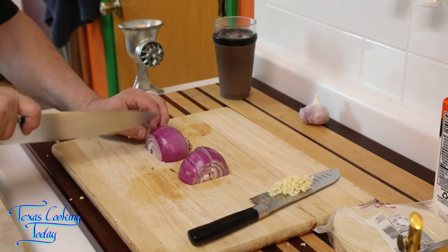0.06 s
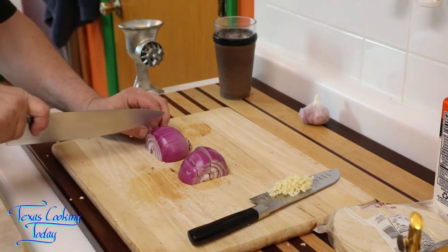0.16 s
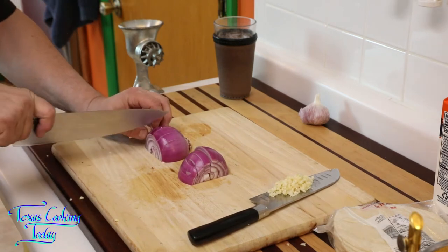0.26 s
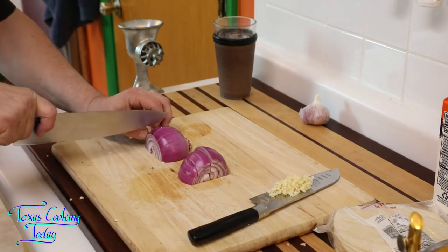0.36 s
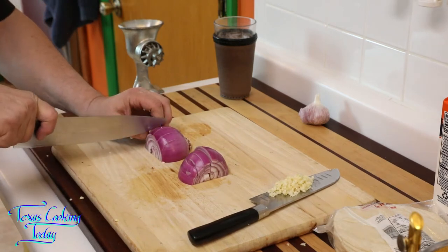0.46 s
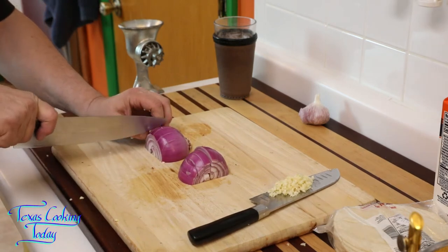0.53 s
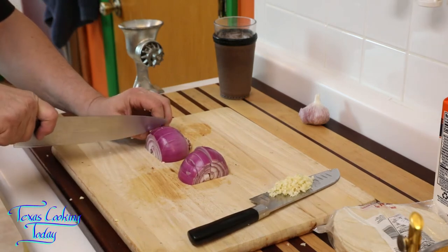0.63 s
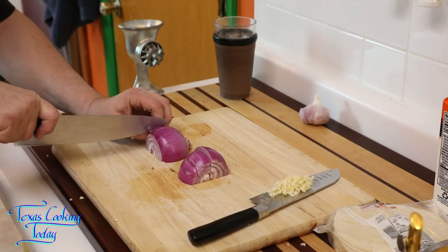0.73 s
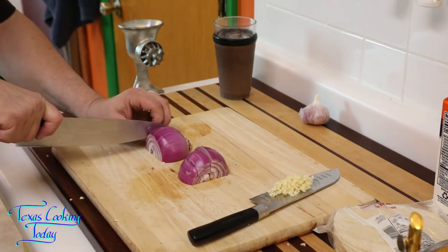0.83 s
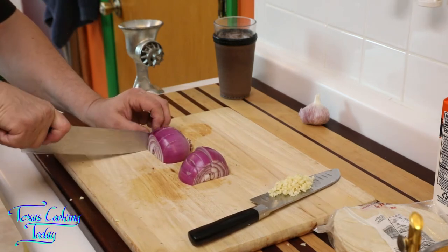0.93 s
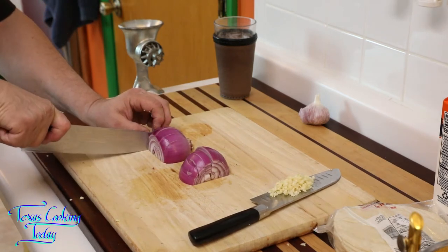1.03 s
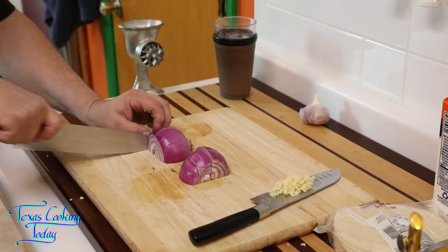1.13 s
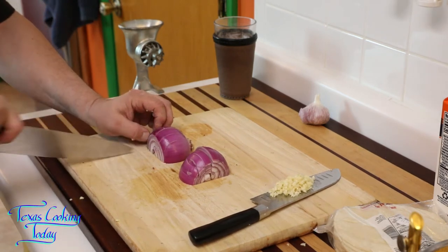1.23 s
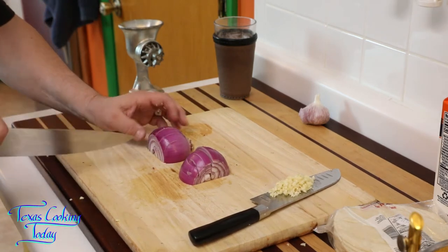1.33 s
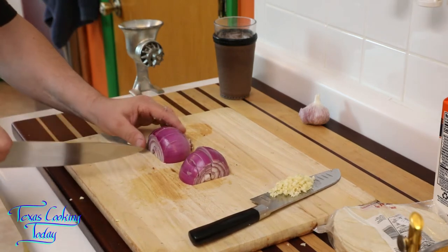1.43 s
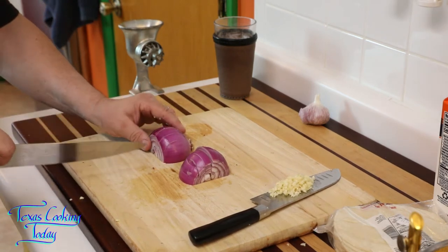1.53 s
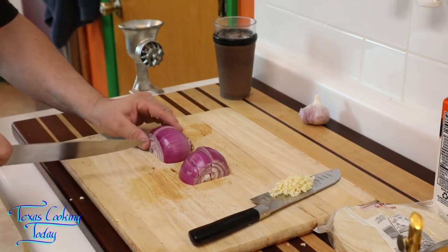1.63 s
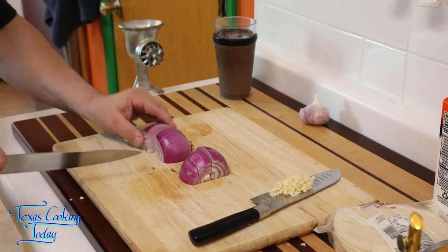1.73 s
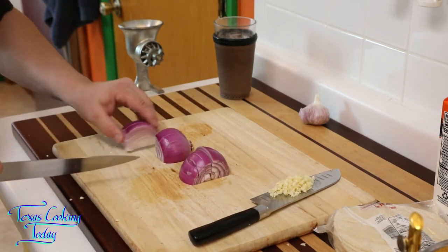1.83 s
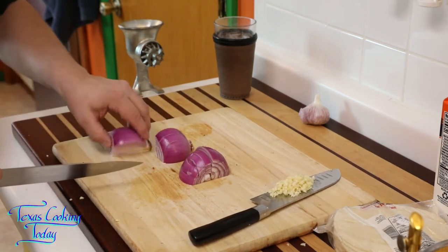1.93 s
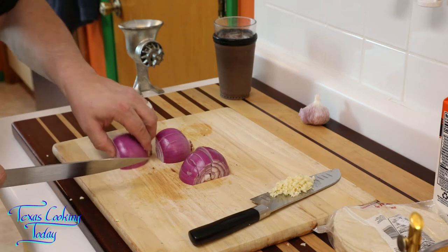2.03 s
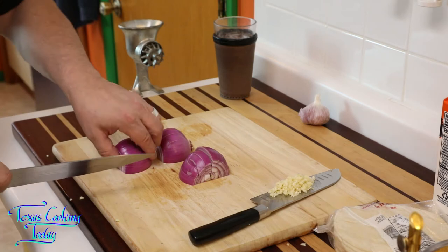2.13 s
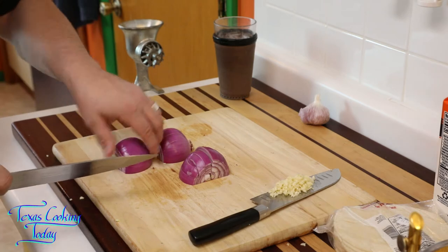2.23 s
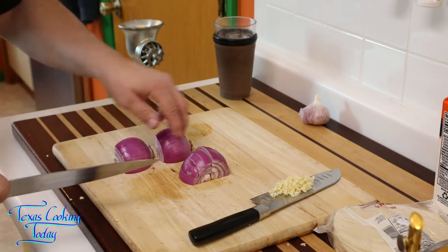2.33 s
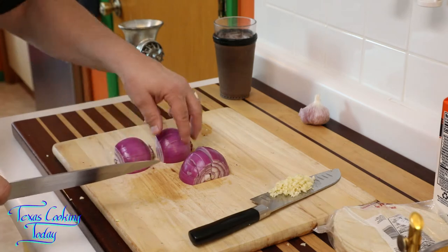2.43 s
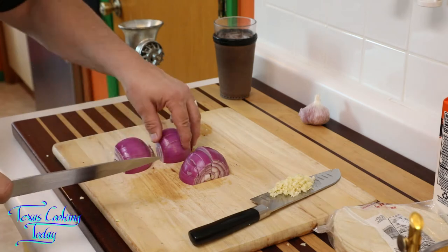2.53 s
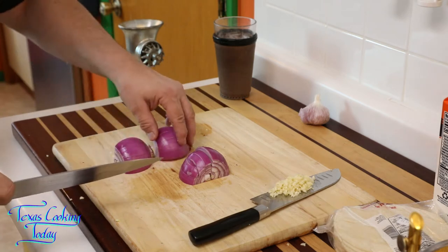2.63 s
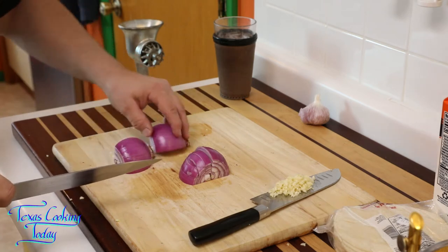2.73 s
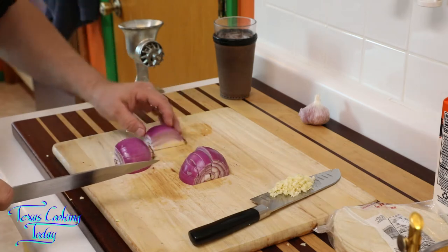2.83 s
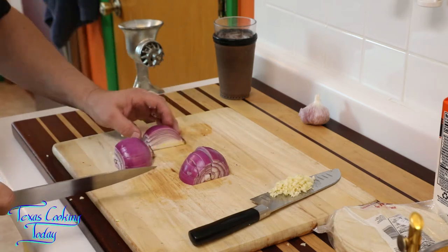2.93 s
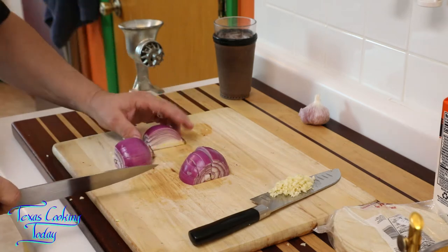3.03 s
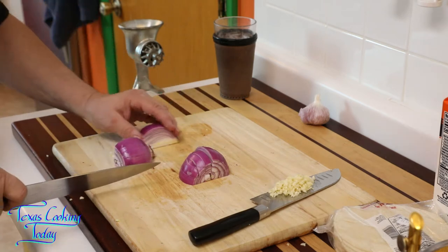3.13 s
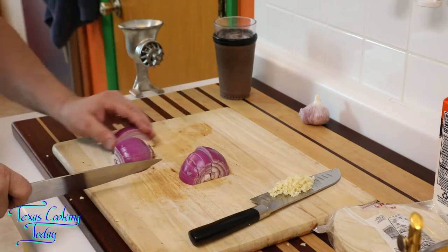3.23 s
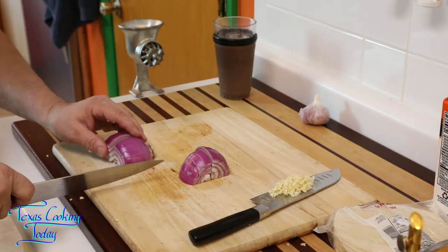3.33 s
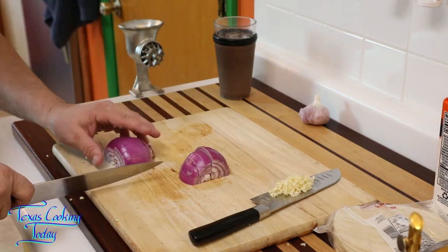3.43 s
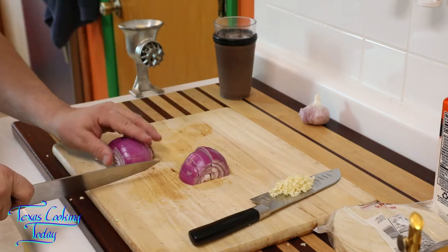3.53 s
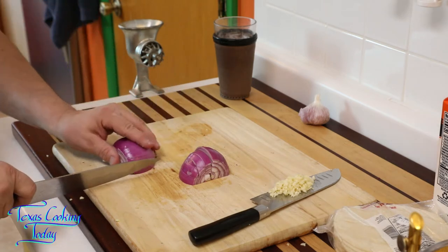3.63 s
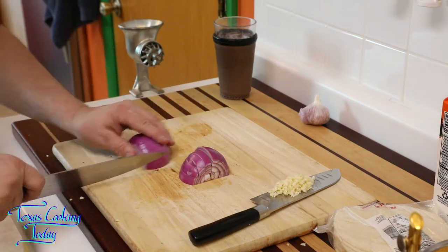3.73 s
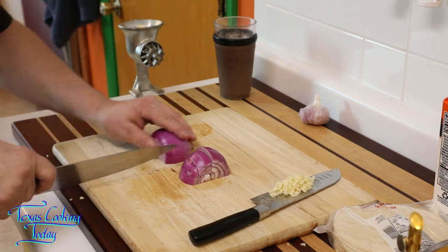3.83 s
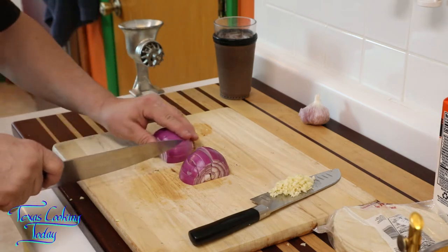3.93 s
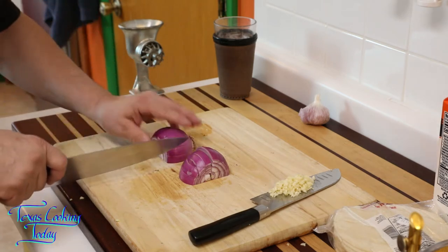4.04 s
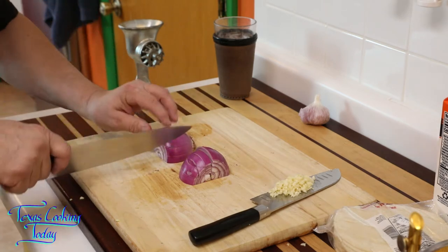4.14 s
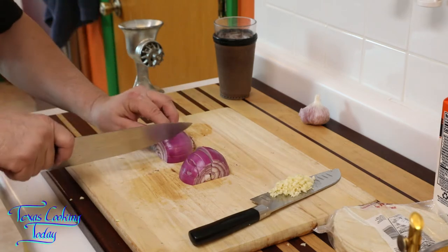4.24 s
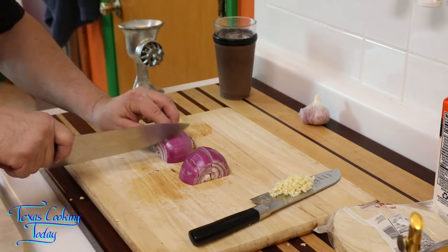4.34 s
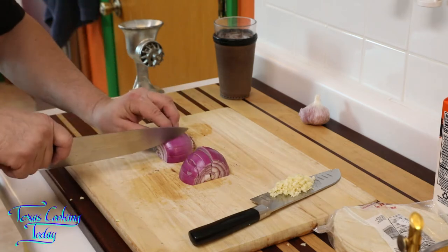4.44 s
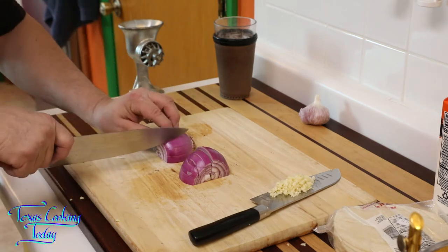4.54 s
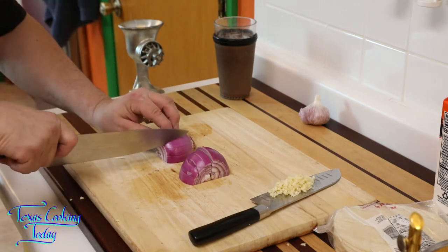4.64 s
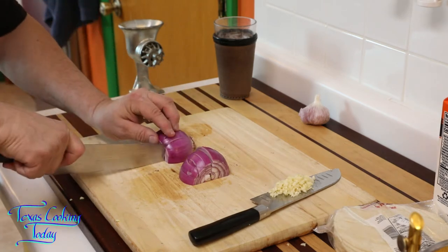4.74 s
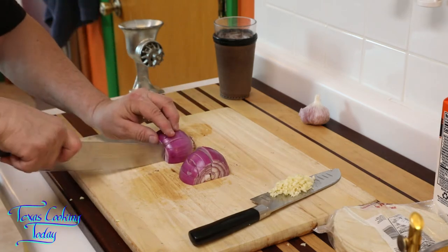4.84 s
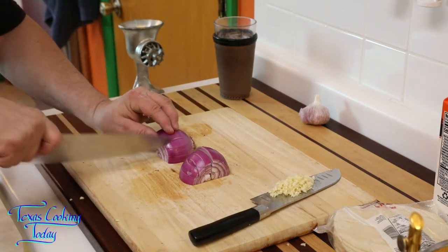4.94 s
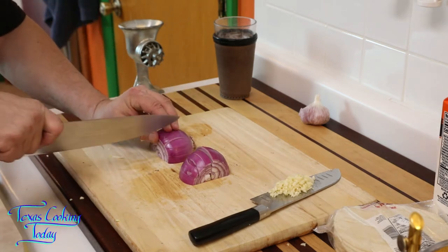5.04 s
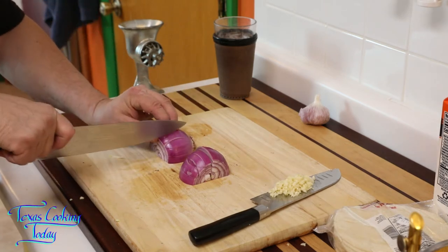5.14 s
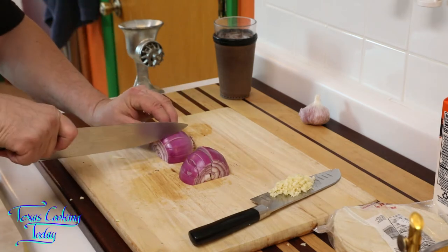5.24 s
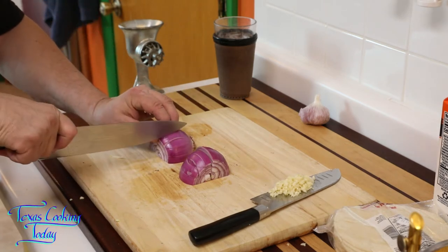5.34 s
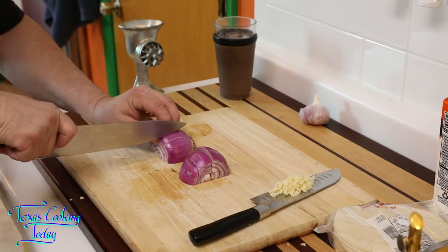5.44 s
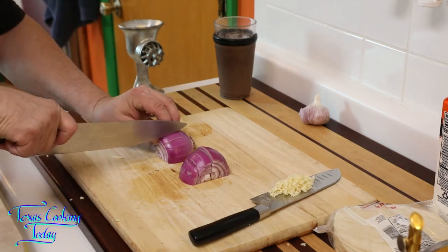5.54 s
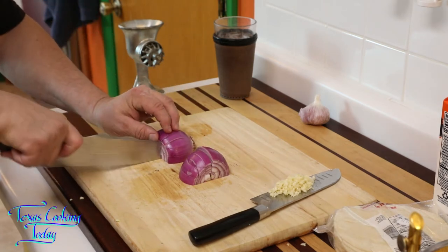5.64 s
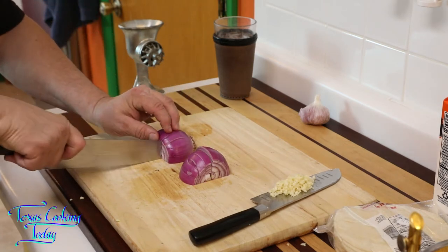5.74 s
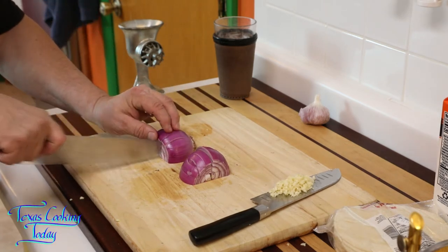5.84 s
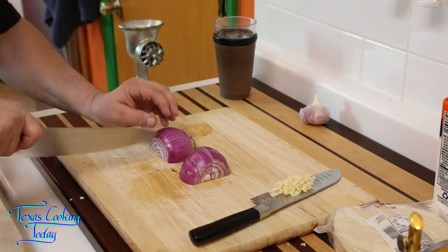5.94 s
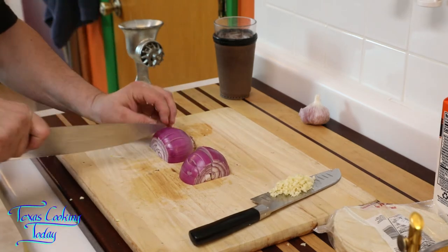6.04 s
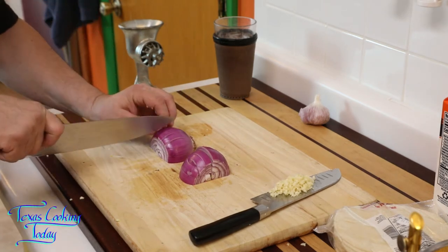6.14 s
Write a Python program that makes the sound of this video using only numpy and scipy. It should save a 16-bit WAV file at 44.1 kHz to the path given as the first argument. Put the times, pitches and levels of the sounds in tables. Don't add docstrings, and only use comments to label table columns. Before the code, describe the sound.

A heavy knife crunches through crisp onion and bangs hard on a wooden board three times, with light taps and slides between, in an echoing tiled kitchen.

```python
import sys
import numpy as np
from scipy import signal
from scipy.fft import rfft, irfft
from scipy.io import wavfile
from scipy.ndimage import uniform_filter1d

SR = 44100
rng = np.random.default_rng(int(sys.argv[2]) if len(sys.argv) > 2 else 0)


def linear_from_db(decibels):
    return 10 ** (np.asarray(decibels, float) / 20)


def master_out(mix):
    frames = np.transpose(np.atleast_2d(mix))
    ceiling = np.clip(frames, -1, 1)
    pcm = np.round(ceiling * 32767).astype(np.int16)
    wavfile.write(sys.argv[1], SR, pcm)


N = 272317
T = np.arange(SR // 2) / SR

# (frequency [Hz], level [dB per Hz])
HUM_SPECTRUM = [(12, -30), (20, 9.5), (222, -1.5), (285, -11.5), (434, -15.5), (678, -17), (780, -16),
                (1030, -14), (1120, -16.5), (2530, -20.5), (2750, -28), (3160, -20.5), (16000, -48)]
# (time [s], effort [dB])
HAND_EFFORT = [(0, 8.5), (.55, -6.5), (.8, -8), (1.3, 10.5), (1.501, 5), (2.151, 2.5), (2.45, -3.5),
               (2.899, 2), (3.3, 0.5), (3.7, 4.5), (4.3, -0.5), (4.649, 0), (5.2, 3), (5.6, 1.5), (6.17, 0)]
# (frequency [Hz], level [dB per Hz])
RUSTLE_SPECTRUM = [(60, -32.5), (150, 6), (350, 6), (700, -3.5), (1500, -13.0), (4000, -45.0)]
# (start [s], length [s], level [dB])
SLIDES = [
    (1.66, 0.22, -66),
    (2.13, .05, -69.5),
    (2.69, .08, -68),
    (3.13, 0.14, -72.5),
    (3.76, 0.14, -52.5),
    (4.07, 0.052, -67.5),
    (5.31, 0.025, -85),
]
# (frequency [Hz], level [dB per Hz])
RUB_SPECTRUM = [(410, -19.5), (700, 5.5), (847, -10), (920, 8), (1020, -12.5), (1210, -3), (1810, -4.5),
                (1990, -4.5), (2620, 0), (2990, -3.5), (3480, -8), (4170, -20), (5220, -11), (12000, -37),
                (15600, -72), (22000, -120)]
# (time [s], peak [dB], hollow body [dB], length [ms])
CRUNCHES = [(0.0004, -31.5, -2.5, 5.1), (.006, -40, -11, 25), (0.0404, -34, -17, 16), (0.057, -38, -6, 44),
            (0.8017, -26.5, -16, 22), (0.8688, -27, -16, 18), (0.8801, -25, -0.5, 17),
            (0.907, -31.5, -6, 23), (.921, -24.5, -4.5, 44), (0.9334, -32, 11.5, 24),
            (.942, -23.5, -1.5, 6.4), (4.6696, -32, 10, 13), (4.6716, -41.5, 15, 25),
            (4.6908, -30.5, -15.5, 9), (4.709, -50.5, 15, 14.0), (4.7374, -18.5, 1.5, 42),
            (4.7431, -19, 7.5, 9.3), (4.757, -30.5, -6, 4), (4.764, -34, 10.5, 1.5),
            (5.6076, -26.5, 5.5, 14.4), (5.6214, -28, -5, 12.4), (5.6509, -18.5, 3.5, 38),
            (5.658, -27.5, 14.5, 11.3), (5.6723, -32, -10.5, 20), (5.692, -12.5, -11, 4)]
# (frequency [Hz], width [Hz], level [dB])
FLESH_MODES = [(605, 40, 8.5), (793, 86, 15), (2500, 330, 24), (3060, 1900, 23.5), (4900, 1300, 9),
               (7800, 3000, -35), (11000, 4000, -41)]
# (frequency [Hz], t60 [s])
KITCHEN_DECAY = [(120, 0.99), (330, 0.26), (870, 0.51), (2300, 0.47), (6000, 0.47), (12000, 0.13)]
# (frequency [Hz], level [dB])
WALL_COLOUR = [(60, -39.5), (150, -31.5), (280, -24.5), (480, -1.5), (780, 1), (1050, -8), (1550, 5),
               (2100, -6), (3000, -7.5), (4500, -17), (7000, -22.5), (11000, -35), (15000, -61)]
# (time [s], peak [dB], contact [ms], echo [dB])
TAPS = [(0.0098, -10.5, 0.35, -11), (0.045, -21.5, 0.18, -24), (0.127, -10, 0.16, -6.5),
        (.13, -9.5, 0.43, -12), (0.1647, -7.5, 0.26, -16), (0.2015, -17.5, 0.56, -2),
        (0.842, -16, 0.2, -6.5), (0.8813, -19.5, 0.9, -10.5), (1.29, -10, 0.36, -12),
        (2.042, -19, 0.32, -17), (2.1001, -28.5, 0.29, -2.5), (2.202, -33.5, 0.35, -28),
        (2.91, -17, 0.48, -8), (3.467, -37, 0.21, -3), (3.4935, -28, 0.43, -15), (4.047, -36, 0.37, -6),
        (4.669, -16, 0.47, -4.5), (5.531, -29.5, 0.3, -6), (5.9075, -9.5, 0.53, -12),
        (5.9419, -13, 0.67, -6.5)]
# (frequency [Hz], level [dB], t60 [s])
BOARD_MODES = [(158, -27, 0.2), (270, -21, .08), (350, -10.5, 0.34), (479, -8, 0.28), (646, 0, 0.053),
               (662, -4.5, 0.31), (765, 5, 0.046), (915, 4.5, 0.028), (1175, 9, 0.015), (1300, 4, 0.022),
               (1530, -7, 0.004), (1710, 17.5, 0.02), (1750, 3, 0.069), (2360, 8.5, 0.033),
               (2809, 5, 0.026), (3470, -4.5, 0.014), (3960, -12, 0.0055)]
# (frequency [Hz], level [dB], t60 [s])
COUNTER_MODES = [(163, -20, 0.2), (341, -3, 0.71), (483, -10, .25), (560, -2, .3), (572, 8, 0.11),
                 (726, -19.5, .3), (828.4, -7.5, .3), (1350, -16, .3), (1610, -11.5, 0.28)]
# (frequency [Hz], level [dB], t60 [s])
SNAP_MODES = [(1727, 26.5, 0.0042), (3800, 8.5, .0025), (7300, 4, 0.003)]
# (time [s], peak [dB], upper modes [dB], scratch [dB], damping by flesh or fingers [ratio])
TICKS = [(0.0702, -50, -19, 8, 2.6), (0.084, -49, 4, -7, .8), (0.488, -36.5, -2, 11, 2.4),
         (0.7597, -42.5, 1.5, 11.5, 5), (0.7885, -52, 2, 10.5, 5), (1.49, -52.5, -25.5, 24.5, 3.0),
         (1.999, -52, -0.5, 11.5, 4), (2.1027, -53, -5, 10, 3.0), (2.3744, -62.5, 1, 17.5, 3.5),
         (3.1283, -70, 9, 37, 1), (3.228, -51, -4, 0.5, 2.5), (3.439, -61, 8, 12.5, 3.0),
         (4.0364, -49, -14.5, 12.5, 3.5), (4.073, -56.5, 5, 4.0, 2.9), (4.4354, -43.5, -3, 3, 0.92),
         (4.478, -48.5, -5.5, -11, 0.92), (4.555, -70, 11.5, 2.5, 1.7), (5.263, -54, 0, 12.5, 1.5),
         (5.305, -57, -14, -5, .8), (5.317, -49, -19, -6, 1.1), (5.331, -45, -16, -6, 1.1),
         (5.425, -53.5, -16, -5, 1.2), (5.4916, -48.5, -10, -6, 1.6), (5.545, -60, 9.5, 3, 2.5)]
# (frequency [Hz], level [dB], t60 [s])
BLADE_MODES = [(1950, -12, .03), (2536, -1, .06), (2832, -8, .04), (3063, -6, .05), (3560, -3, .06),
               (5000, -22, .05), (7305, -22, .045), (8800, -22, .05), (9625, -16, .07), (10500, -16, .055)]
# (start [s], length [s], level [dB])
PRESSES = [
    (.12, .04, -47.5),
    (.49, .01, -50),
    (.825, .11, -40.5),
    (.96, .02, -30),
    (4.705, .02, -37.5),
    (4.775, 0.012, -37.5),
    (5.64, 0.017, -36),
    (5.7, .02, -29),
]
# (frequency [Hz], level [dB per Hz])
FLEX_SPECTRUM = [(90, -44.0), (130, 2.5), (152, 12.5), (175, -2.0), (260, -48.0)]
# (start [s], length [s], level [dB])
SCUFFS = [
    (.6, 0.1, -65.5),
]
# (frequency [Hz], level [dB per Hz])
SCUFF_SPECTRUM = [(700, -29.5), (1000, -2), (1200, 1.0), (1450, -9), (2200, -30)]
# (time [s], peak [dB], contact [ms], tilt [dB per octave])
CHOPS = [
    (0.9598, 2.5, 0.15, -1.5),
    (4.771, 2.5, 0.28, 0),
    (5.698, 2.5, 0.68, 8),
]
# (time [s], peak [dB], contact [ms])
THUDS = [
    (1.52, -47, 1.1),
    (3, -39.5, 0.82),
    (3.161, -40, 1.7),
    (3.6019, -23.5, 1.24),
    (3.62, -33, 3),
    (3.644, -27, 1.95),
    (3.664, -41, 0.78),
    (4.08, -59, 1.3),
    (5.258, -37.5, 1.8),
]


def evened(x):
    return x / np.sqrt(np.mean(x ** 2) + 1e-20)


def read(points, hz):
    f, value = np.transpose(points)
    return np.interp(np.log(hz + 1), np.log(f + 1), value)


def add(mix, s, sound):
    part = mix[max(round(s * SR), 0):][:len(sound)]
    part += sound[:len(part)]


def filtered(x, order, hz, kind="low"):
    return signal.lfilter(*signal.butter(order, np.asarray(hz) / SR * 2, kind), x)


def smoothed(x, rows, columns):
    return uniform_filter1d(uniform_filter1d(x, size=rows, axis=0), size=columns, axis=1)


def noise(spectrum, patchy_db):
    frames, hz = N // 256 + 5, np.fft.rfftfreq(1024, 1 / SR)
    real, imaginary, patches = rng.standard_normal((frames, 513, 3)).T
    patches = evened(smoothed(patches, 10, 10))
    level_db = read(spectrum, hz)[:, None] + patchy_db * patches
    z = (real + 1j * imaginary) * linear_from_db(level_db)
    return evened(signal.istft(z, nperseg=1024, noverlap=768)[1][:N])


def strokes(rows, rise_db_s, fall_db_s):
    t = np.arange(N) / SR
    gain = np.zeros(N)
    for s, length, db in rows:
        before, after = np.maximum(s - t, 0), np.maximum(t - s - length, 0)
        gain += linear_from_db(db - rise_db_s * before - fall_db_s * after)
    return gain


def effort():
    return np.interp(np.arange(N) / SR, *np.transpose(HAND_EFFORT))


def hum():
    return linear_from_db(-54.5) * noise(HUM_SPECTRUM, patchy_db=2.0)


def rustle():
    return linear_from_db(-54.5 + effort()) * noise(RUSTLE_SPECTRUM, patchy_db=4.0)


def rub():
    faint = linear_from_db(-68.5 + 0.97 * effort())
    slides = strokes(SLIDES, rise_db_s=139.5, fall_db_s=243)
    return (faint + slides) * noise(RUB_SPECTRUM, patchy_db=1.5)


def crunch(cells_per_s, spread_db):
    crisp_top_db, crisp_edge_hz = 6, 9000
    out, t = np.zeros(N), T[:3000]
    hz, width, db = np.transpose(FLESH_MODES)[:, :, None]
    decay = np.exp(-np.pi * width * t[:600])
    rings = linear_from_db(db) * decay * np.sin(2 * np.pi * hz * t[:600]) * np.sqrt(width)
    hollow_ring = rings[:2].sum(0)
    crisp_ring = rings[2:4].sum(0) + linear_from_db(crisp_top_db) * rings[4:].sum(0)
    draws = rng.random((len(CRUNCHES), 3, 3000))
    for (s, db, body_db, length_ms), (chance, sign, size) in zip(CRUNCHES, draws):
        bursts = (chance < cells_per_s / SR) * np.sign(sign - .5)
        cells = bursts * linear_from_db(-spread_db * np.log(size + 0.021))
        cells *= np.exp(-(t * 1000 / length_ms) ** 3) + .04 * np.exp(-t / .009)
        hollow = signal.fftconvolve(cells, hollow_ring)
        crisp = filtered(signal.fftconvolve(cells, crisp_ring), 1, crisp_edge_hz)
        add(out, s, linear_from_db(db) * (crisp / abs(crisp).max() + linear_from_db(body_db) * hollow / abs(hollow).max()))
    return out


def tile_bounce(near):
    delay_ms, level_db = 1.908, -9.5
    return linear_from_db(level_db) * np.roll(near, round(delay_ms * SR / 1000))


def kitchen_echo(x):
    taps = np.zeros(SR)
    at = np.arange(260, SR - 20, 14)
    taps[at + rng.integers(0, 14, len(at))] = rng.choice([-1., 1.], len(at))
    hz, t, z = signal.stft(taps, SR, nperseg=256)
    clumps = evened(smoothed(rng.standard_normal(z.shape), 8, 3))
    decay_db = 60 * t / read(KITCHEN_DECAY, hz)[:, None]
    level_db = read(WALL_COLOUR, hz)[:, None] - decay_db + 1.8 * clumps
    tail = signal.istft(z * linear_from_db(level_db), SR, nperseg=256)[1]
    return signal.fftconvolve(x, tail / np.linalg.norm(tail))[:N]


def ring(modes, place_db, damping=1):
    hz, db, t60 = np.transpose(modes)[:, :, None]
    sign = (-1.) ** np.arange(len(modes))[:, None]
    swell = 1 - np.exp(-T * hz * 4.7)
    level = linear_from_db(db + place_db[:, None] - 60 * damping * T / t60)
    return (sign * swell * level * np.sin(2 * np.pi * hz * T)).sum(0)


def contacts(length_ms, draw):
    patter = draw * np.exp(-np.arange(len(draw)) / SR * 1000 / max(length_ms, .1))
    return np.r_[1., patter[1:]]


def tilted(x, tilt_db):
    hz = np.fft.rfftfreq(2048, 1 / SR)
    octaves = np.log2(np.clip(hz, 350, 5000) / 1000)
    return np.roll(irfft(rfft(x, 2048) * linear_from_db(tilt_db * octaves)), 64)


def knock(contact_ms, roll_ms, tilt_db, counter_db, draw):
    u = T[:200] * 1000 / (0.26 * np.clip(contact_ms, .05, 3))
    force = u * np.exp(-u)
    rolls = 0.67 * draw[:900] * (draw[900:1800] > 1.9)
    blows = np.convolve(force / force.sum(), contacts(roll_ms, rolls))
    hz = np.array(BOARD_MODES)[:, 0]
    place_db = 2.0 * draw[-len(BOARD_MODES):] + tilt_db * np.log2(hz / 1000) * (hz > 300)
    damping = 1 + 2.6 * contact_ms ** 2
    body = ring(BOARD_MODES, place_db, damping)
    body += linear_from_db(counter_db) * ring(COUNTER_MODES, .5 * draw[-len(COUNTER_MODES):])
    body += ring(SNAP_MODES, np.full(len(SNAP_MODES), 0.43 * tilt_db))
    sound = signal.fftconvolve(body, blows)
    return sound / abs(sound).max(), tilted(force / np.linalg.norm(force), 0.47 * tilt_db)


def knocks(table, counter_db, send_db):
    near, far = np.zeros((2, N))
    draws = rng.standard_normal((len(table), 1900))
    for (s, db, contact_ms, roll_ms, echo_db, tilt_db), draw in zip(table, draws):
        sound, blows = knock(contact_ms, roll_ms, tilt_db, counter_db, draw)
        add(near, s, linear_from_db(db) * sound)
        add(far, s, linear_from_db(db + echo_db + send_db) * blows)
    return near, far


def light_knocks(table):
    near, far = knocks(table, counter_db=-43.5, send_db=8)
    return near, filtered(far, 2, 3200)


def taps():
    roll_ms, tilt_db, tilt_per_db = 0.5, -1.55, 0.5722
    return light_knocks([(s, db, ms, roll_ms, echo_db, tilt_db + tilt_per_db * (db + 18.5))
                         for s, db, ms, echo_db in TAPS])


def blade():
    out, upper = np.zeros(N), np.array(BLADE_MODES)[:, 0] > 4000
    draws = rng.standard_normal((len(TICKS), 800))
    for (s, db, upper_db, scratch_db, damping), draw in zip(TICKS, draws):
        scrape = contacts(2.4, .5 * draw[:700])
        place_db = upper_db * upper + 1.2 * draw[-len(BLADE_MODES):]
        steel = signal.fftconvolve(ring(BLADE_MODES, place_db, max(damping, .5)), scrape)
        dull = filtered(scrape, 2, [1800, 4500], "band")
        bright = filtered(scrape, 2, [4500, 11000], "band")
        scratch = dull + linear_from_db(upper_db - 15.0) * bright
        add(out, s, linear_from_db(db - 1.0) * steel / abs(steel).max())
        add(out, s, linear_from_db(db - 8.0 + scratch_db) * scratch / abs(scratch).max())
    return out


def flexing_board():
    flex_hz, roughness = 150.3, .35
    tone = np.sin(2 * np.pi * flex_hz * np.arange(N) / SR)
    rough = roughness * noise(FLEX_SPECTRUM, patchy_db=-3.5)
    press = strokes(PRESSES, rise_db_s=595, fall_db_s=223.5) * (tone + rough)
    return filtered(press, 2, [135, 168], "band")


def scuff():
    return strokes(SCUFFS, 400, 400) * noise(SCUFF_SPECTRUM, patchy_db=1.5)


def chops():
    roll_ms, echo_db = 3.83, 0.96
    table = [(s, db, ms, roll_ms, echo_db, tilt_db) for s, db, ms, tilt_db in CHOPS]
    return knocks(table, counter_db=-14, send_db=13)


def thuds():
    roll_ms, echo_db, tilt_db = 2.1, -3.5, -11
    return light_knocks([(s, db, ms, roll_ms, echo_db, tilt_db) for s, db, ms in THUDS])


def scene():
    floor = hum() + rustle() + rub() + flexing_board() + scuff()
    cells, steel = crunch(cells_per_s=5500, spread_db=3.5), blade()
    taps_near, taps_far = taps()
    chops_near, chops_far = chops()
    thuds_near, thuds_far = thuds()
    near = linear_from_db(4.0) * chops_near + taps_near + thuds_near + cells + steel
    far = chops_far + taps_far + thuds_far + linear_from_db(-14.5) * cells + linear_from_db(-12.5) * steel
    hits = near + tile_bounce(near) + kitchen_echo(far)
    hits = filtered(hits, 3, 130, "high")
    return (hits + floor)[None]


def low_pass(x):
    return signal.sosfilt(signal.butter(12, 16310, fs=SR, output="sos"), x)


def record(dry):
    power_db = 10 * np.log10(abs(uniform_filter1d(dry[0] ** 2, size=300)) + 1e-12)
    fall = np.arange(N) * 180.0 / SR
    held_db = np.maximum.accumulate(power_db + fall) - fall
    over_db = np.maximum(held_db + 15, 0)
    slow_db = signal.lfilter([.0025], [1, -.9975], over_db)
    ducked = dry / linear_from_db(0.22 * slow_db)
    clipped = ducked / (1 + abs(ducked) ** 12) ** (1 / 12)
    clipped = signal.sosfilt(signal.butter(12, 15300 / SR * 2, output="sos"), clipped)
    clipped = filtered(clipped, 2, 55, "high")
    return low_pass(clipped)


dry = scene()
out = record(dry)
master_out(out)
```